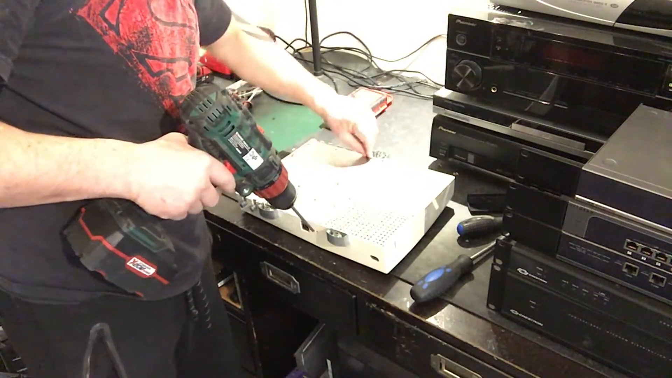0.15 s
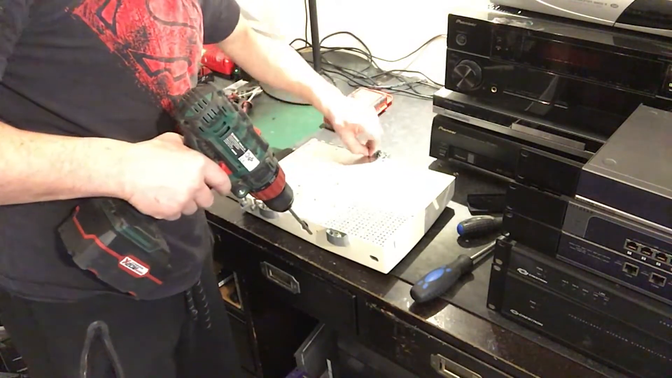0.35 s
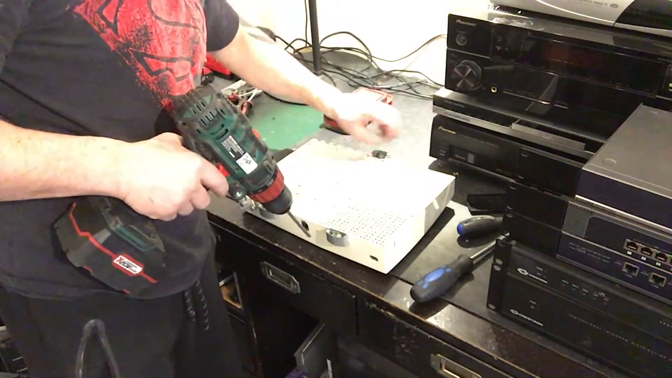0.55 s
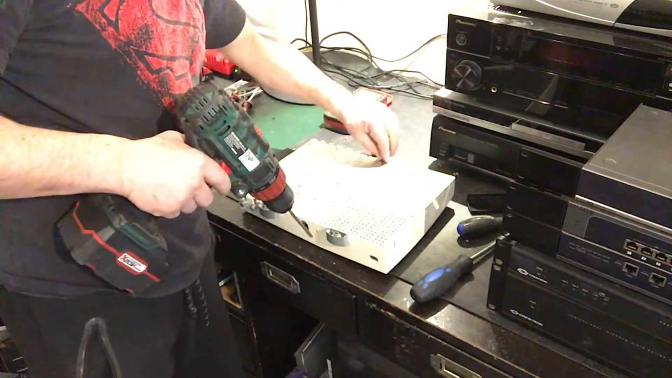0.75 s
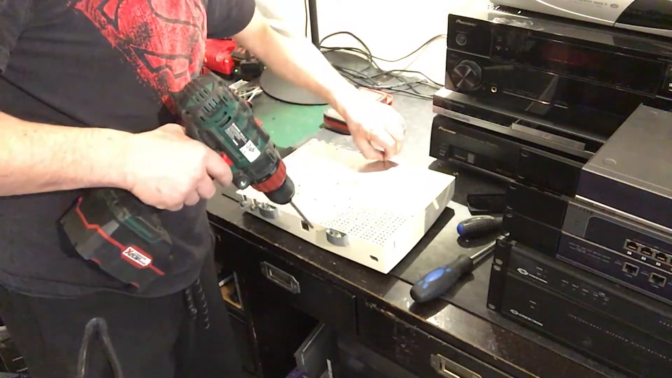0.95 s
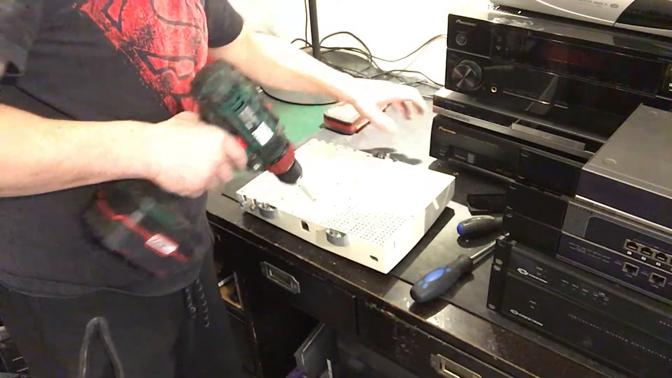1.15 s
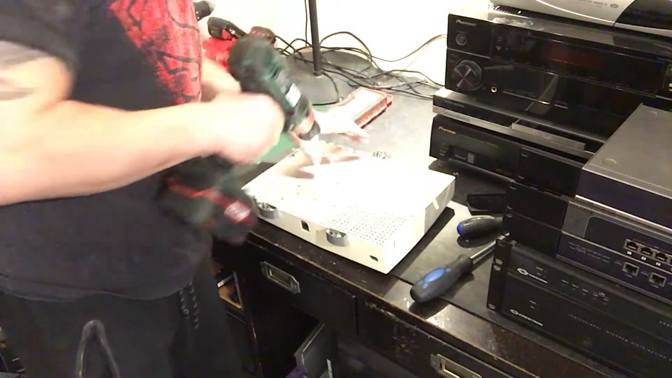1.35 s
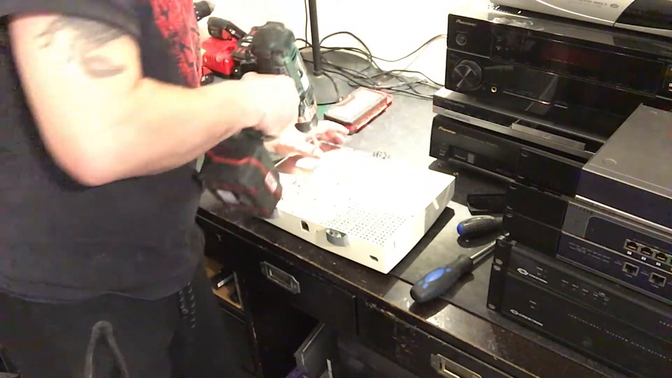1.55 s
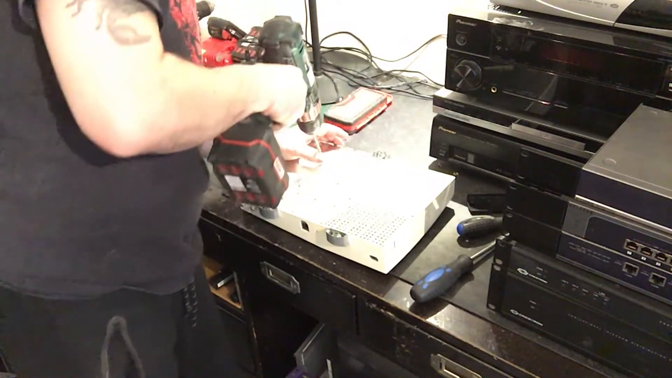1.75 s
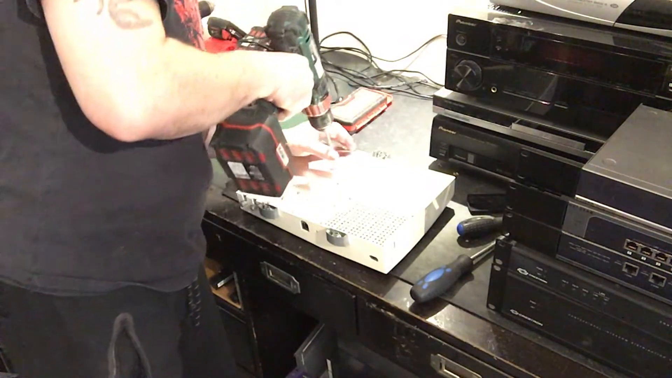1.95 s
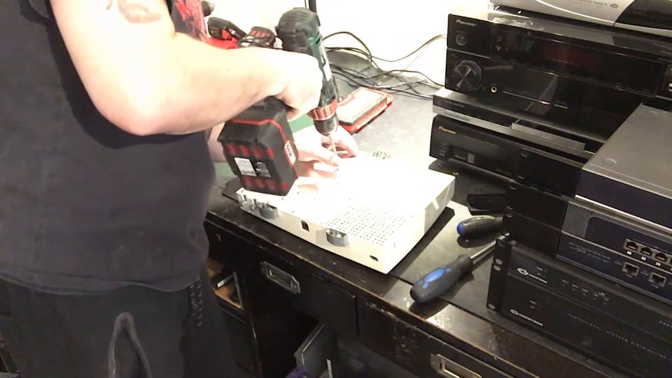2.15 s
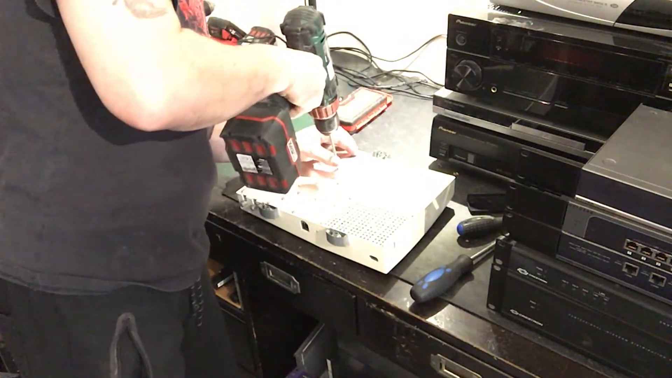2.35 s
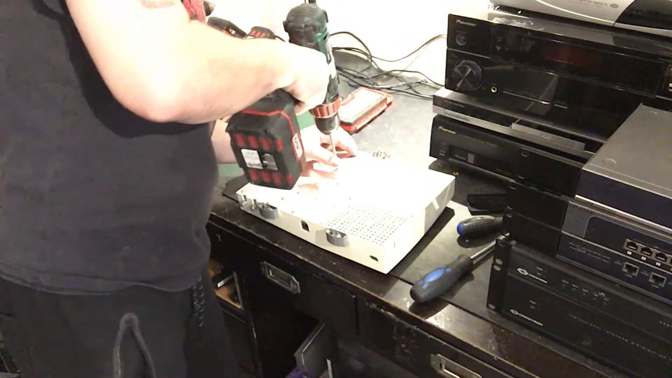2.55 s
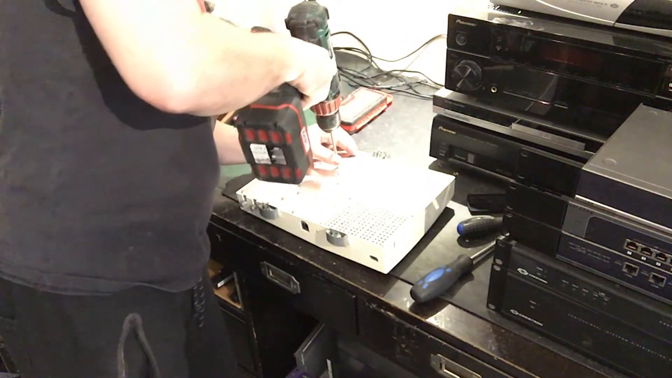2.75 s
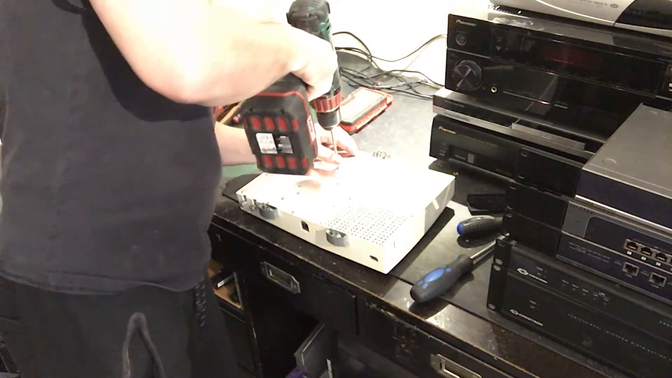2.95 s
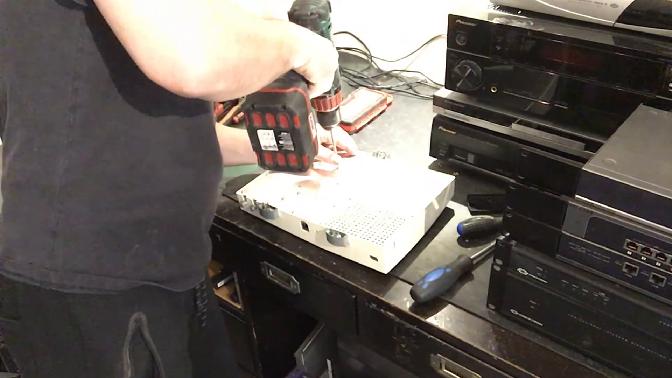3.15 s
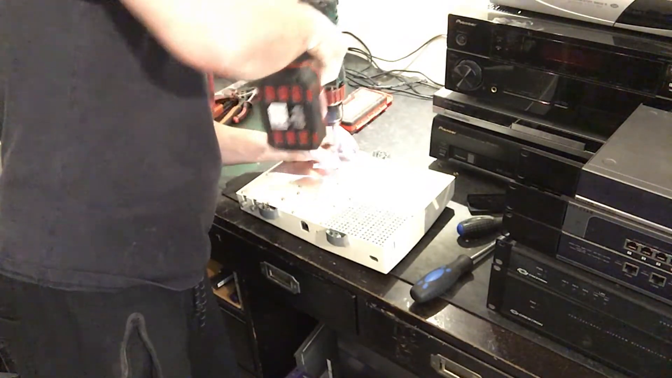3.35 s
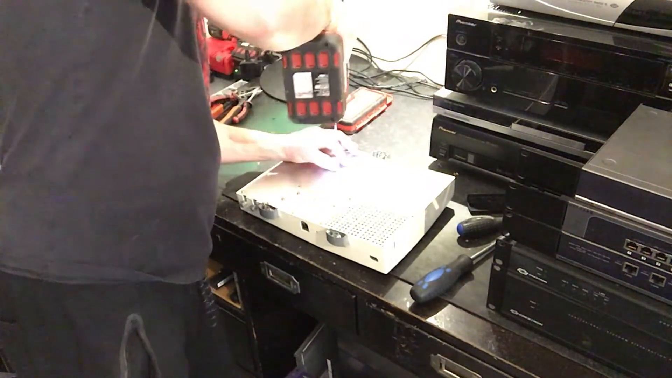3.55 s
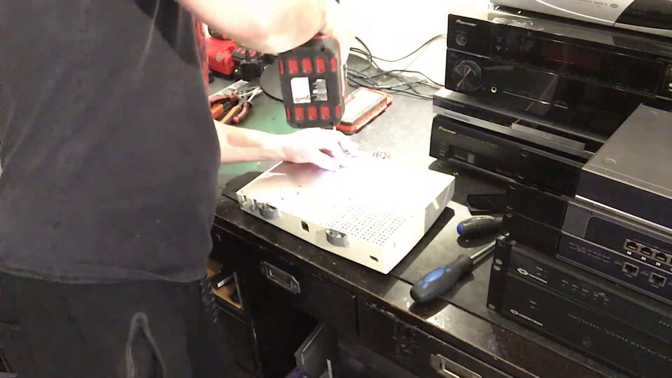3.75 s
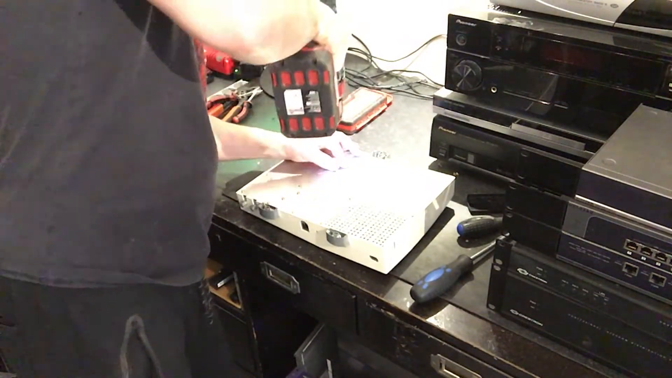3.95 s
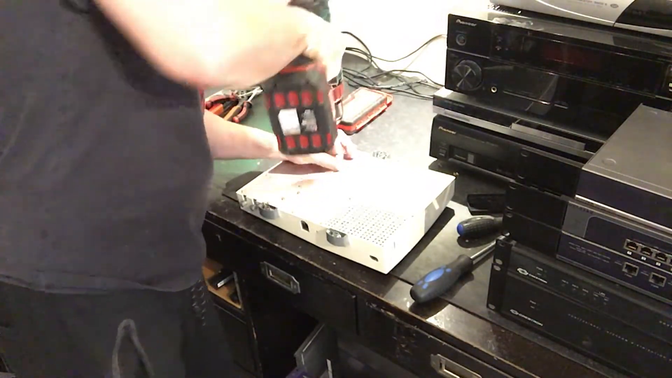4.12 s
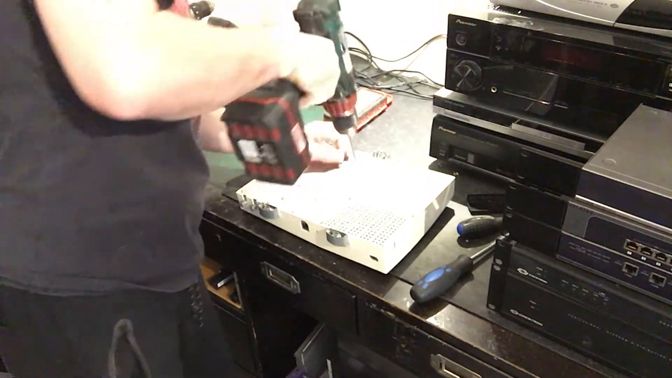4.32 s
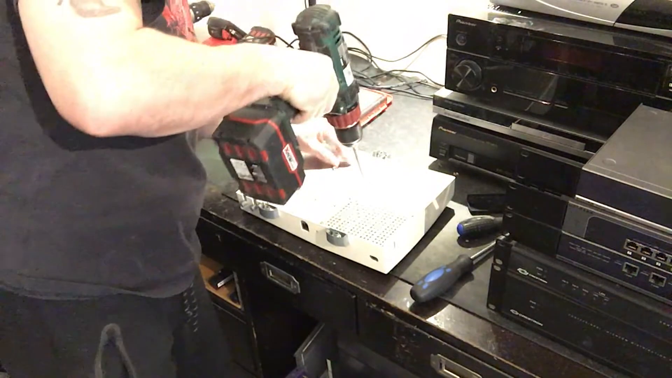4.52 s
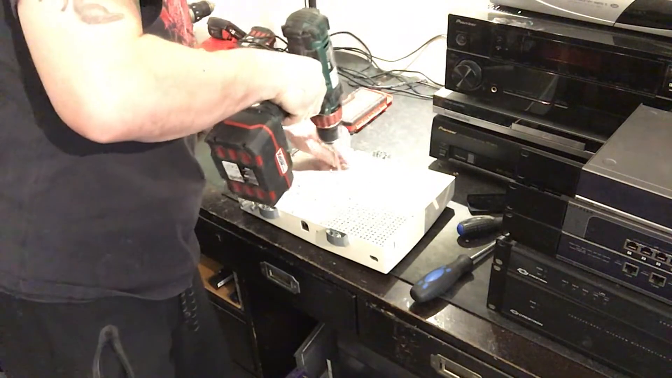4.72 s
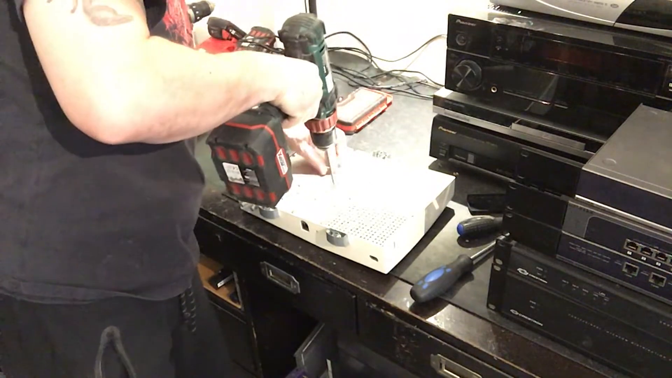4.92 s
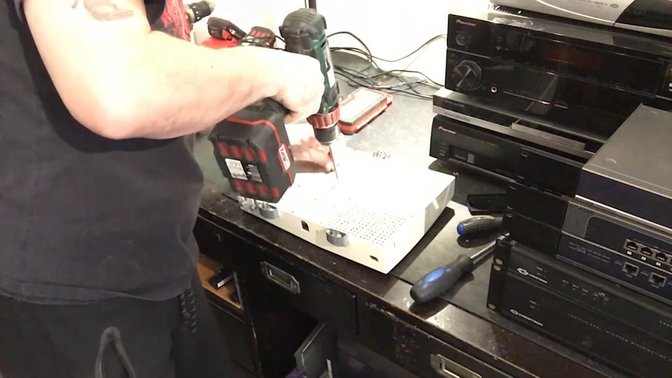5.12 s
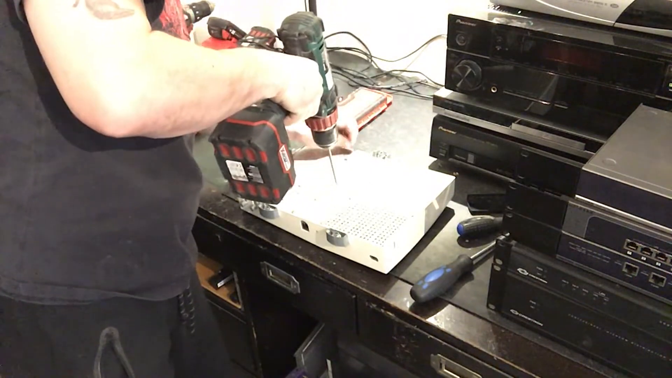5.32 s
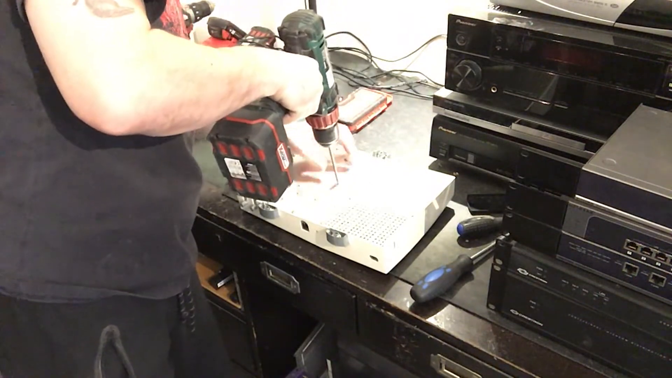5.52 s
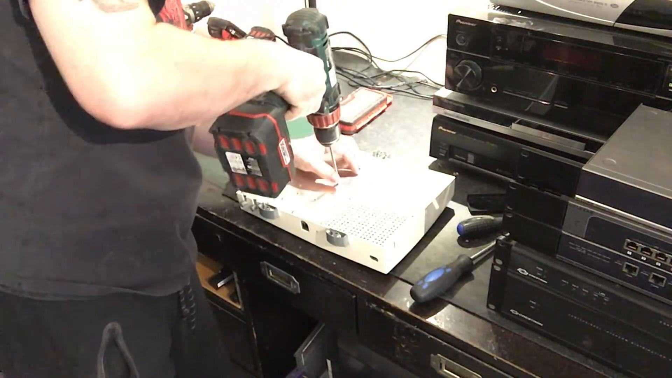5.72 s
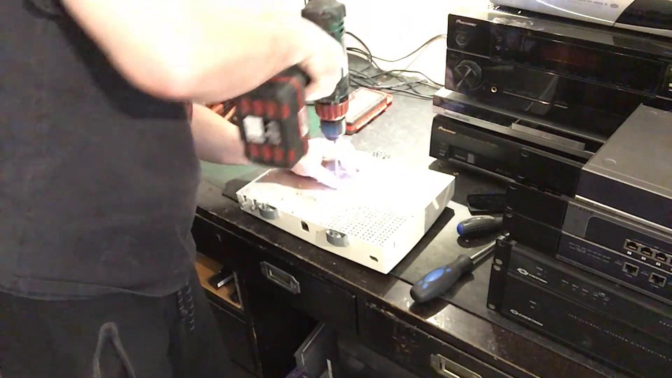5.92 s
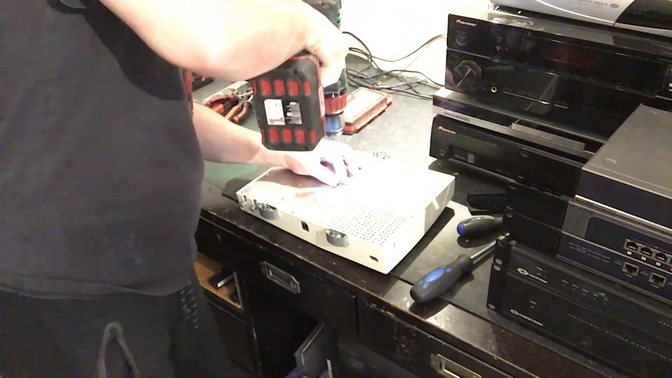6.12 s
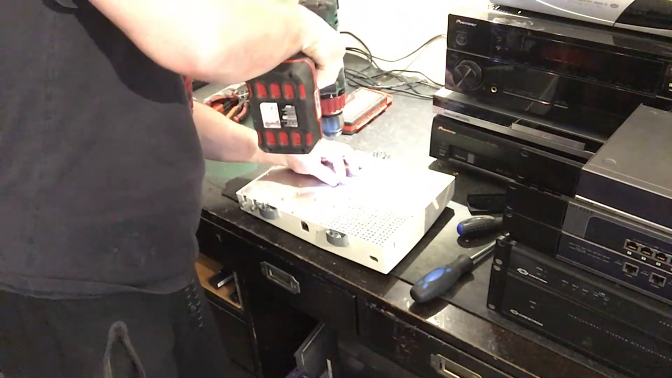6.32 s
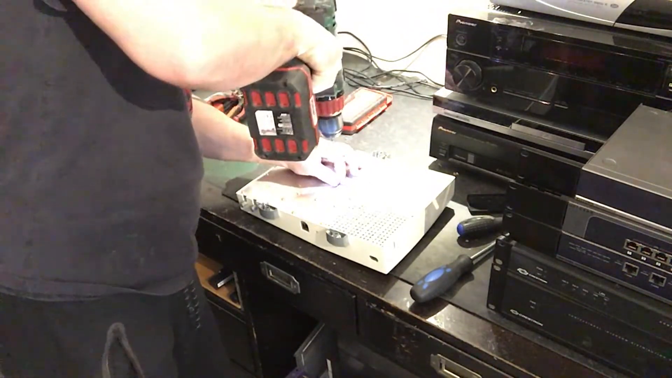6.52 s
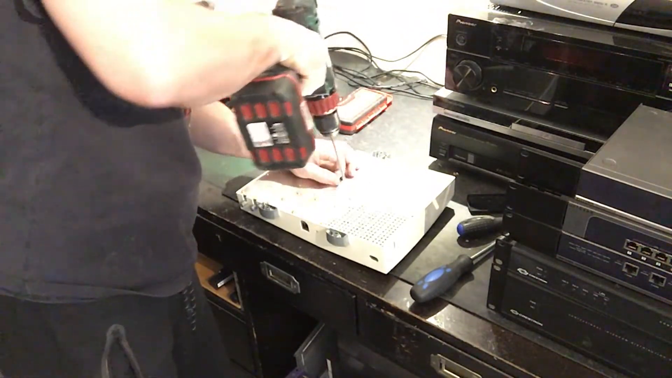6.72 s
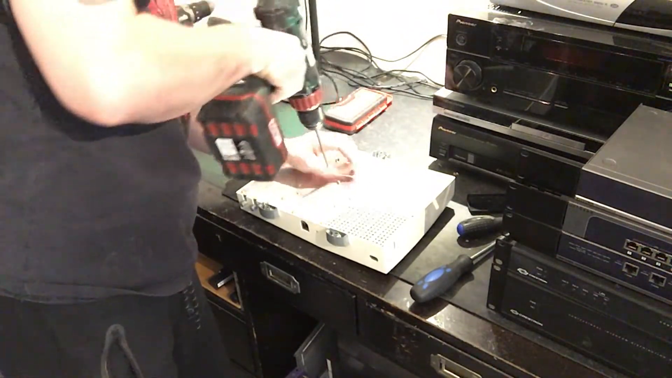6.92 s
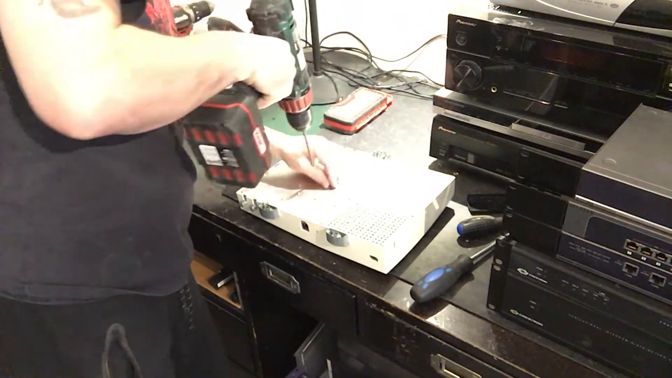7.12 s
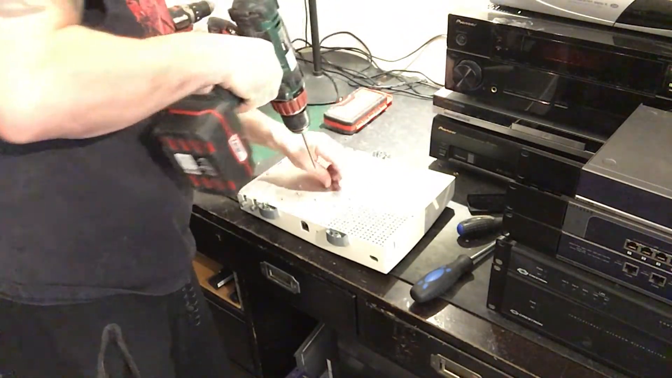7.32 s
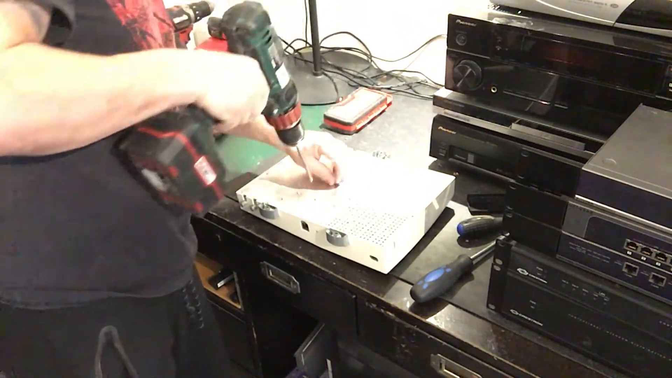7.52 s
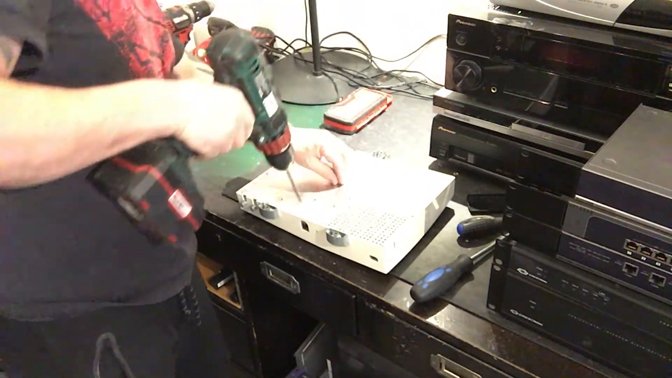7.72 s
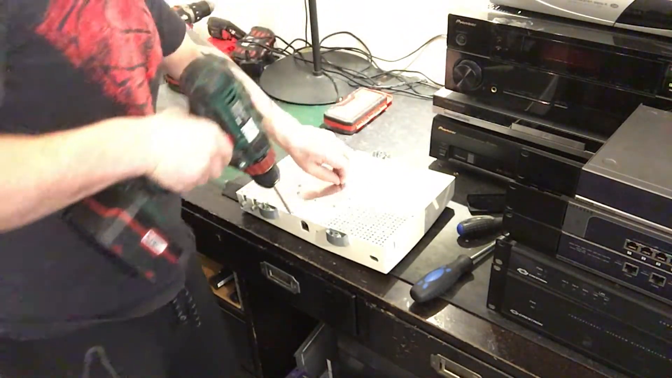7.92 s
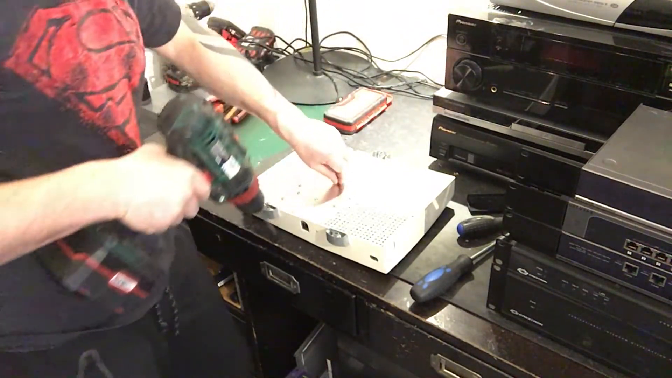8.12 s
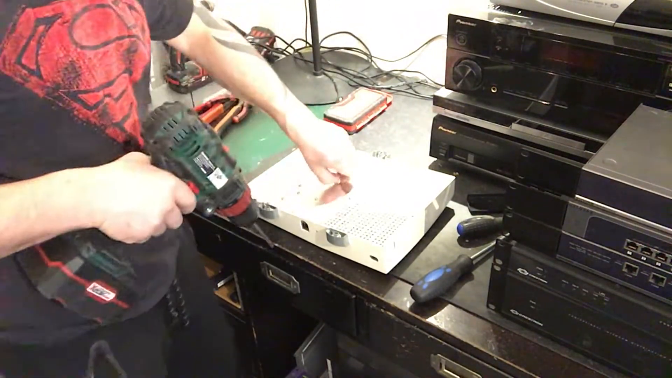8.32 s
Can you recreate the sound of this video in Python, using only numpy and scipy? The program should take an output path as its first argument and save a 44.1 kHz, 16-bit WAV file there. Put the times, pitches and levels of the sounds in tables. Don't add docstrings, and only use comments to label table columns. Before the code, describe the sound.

Light taps and rubs on a hollow casing, then two brief chattering drill runs with sharp clutch and brake knocks, in a small workshop.

```python
import sys
import numpy as np
from scipy import signal
from scipy.fft import rfft, irfft, next_fast_len
from scipy.io import wavfile
from scipy.ndimage import uniform_filter1d

SR = 44100
rng = np.random.default_rng(int(sys.argv[2]) if len(sys.argv) > 2 else 0)


def boost_factor(decibels):
    exponent = np.asarray(decibels, float) / 20
    return 10 ** exponent


def to_wav(s):
    ch = np.atleast_2d(s).T
    pcm = np.round(np.clip(ch, -1, 1) * 32767)
    wavfile.write(sys.argv[1], SR, pcm.astype(np.int16))


N = 373527


def in_time(tables):
    t, out = np.arange(N) / SR, 0
    for rows in tables:
        s, *columns = np.transpose(rows)
        playing = (t >= s[0]) & (t < s[-1])
        out = out + boost_factor([np.interp(t, s, c) for c in columns]) * playing
    return uniform_filter1d(out, size=300, axis=1)


def rms_one(x):
    return x / np.sqrt(np.mean(x ** 2) + 1e-20)


def at_hz(points, hz):
    point_hz, value = np.transpose(points)
    return np.interp(np.log(hz + 1e-9), np.log(point_hz), value)


def band(x, low_hz, high_hz):
    sos = signal.butter(2, [low_hz, min(high_hz, 20000)], "band", fs=SR, output="sos")
    return signal.sosfilt(sos, x)


def coloured(x, spectrum):
    size = next_fast_len(N)
    gain = boost_factor(at_hz(spectrum, np.fft.rfftfreq(size, 1 / SR)))
    return irfft(rfft(x, size) * gain, size)[:N]


def drift(rate_hz):
    r = np.exp(-2 * np.pi * rate_hz / SR)
    wander = signal.lfilter([1], [1, -2 * r, r * r], rng.standard_normal(N + SR))
    return rms_one(wander[SR:])


def resonate(x, hz, width_hz):
    r = np.exp(-np.pi * width_hz / SR)
    poles = [1, -2 * r * np.cos(2 * np.pi * hz / SR), r * r]
    return signal.lfilter([(1 - r * r) / 2, 0, (r * r - 1) / 2], poles, x)


def grains(per_s, spread_db):
    sizes = boost_factor(spread_db * np.minimum(rng.exponential(1, N), 4)) * rng.standard_normal(N)
    return rms_one(sizes * (rng.random(N) < per_s / SR))


def spin(start, stop, db, brake_db):
    slack_s, spin_up_s, settle_s, brake_s, run_down_s = 0.017, 0.021, 0.21, 0.012, 0.12
    slack_db, cold_db, rest_db = -14, -1.5, -27
    bright_db, rest_bright_db = -9.5, -20
    buzz_db, free_buzz_db = -8, -21
    return [(start, db + slack_db, rest_bright_db, free_buzz_db),
            (start + slack_s, db + slack_db, rest_bright_db, free_buzz_db),
            (start + spin_up_s, db + cold_db, bright_db, free_buzz_db),
            (start + settle_s, db, bright_db, buzz_db),
            (stop - brake_s, db, bright_db, buzz_db),
            (stop, db + brake_db, bright_db, free_buzz_db),
            (stop + run_down_s, db + rest_db, rest_bright_db, buzz_db)]


# trigger pulled and released in seconds, gear chatter in dB, brake surge in dB.
DRILL_RUNS = [
    (3.523, 4.209, -29, 6),
    (6.001, 6.709, -26.5, 0),
]
# frequency in Hz, level in dB per Hz.
GEAR_SPECTRUM = [(120, -31), (200, 7.5), (380, 1), (456, -14), (529, -5), (986, -1), (1710, 3), (2290, 1.5),
                 (3070, 4), (7270, -1), (10300, -14), (13800, -15), (16000, -19.5)]
# frequency in Hz, width in Hz, level in dB.
HOUSING = [(690, 560, -12), (877, 150, -5), (1780, 170, -7), (2160, 57, -6), (2865, 950, -11),
           (3055, 90, -6), (3990, 60, -6.5), (4465, 70, -4.5), (5800, 200, -9), (7200, 250, -9),
           (11600, 500, -19), (13700, 500, -19)]


def drill():
    level, bright, buzz = in_time([spin(*run) for run in DRILL_RUNS])
    teeth = grains(10000, spread_db=1.8)
    rings = sum(boost_factor(db + 4 * drift(16)) * resonate(teeth, hz, width) for hz, width, db in HOUSING)
    whirr = coloured(teeth, GEAR_SPECTRUM) + boost_factor(2.5) * rings
    low, middle, high = [rms_one(band(whirr, *edges)) * boost_factor(0.41 * drift(25.7))
                         for edges in ((200, 710), (1100, 5110), (7500, 23500))]
    return level * (buzz * boost_factor(-7.5) * low - middle + bright * high)


# start, fullest moment and end in seconds, level in dB, frequency in Hz.
SINGS = [(6.0, 6.005, 6.03, -37, 4500), (6.015, 6.03, 6.05, -33.5, 5100), (6.05, 6.1, 6.19, -35, 4600),
         (6.09, 6.16, 6.25, -35.5, 2900), (6.17, 6.25, 6.33, -41, 4300), (6.16, 6.25, 6.36, -42.5, 1670),
         (6.26, 6.38, 6.46, -35, 3080), (6.28, 6.4, 6.5, -41, 1900), (6.46, 6.54, 6.62, -37, 2740),
         (6.52, 6.64, 6.72, -33.5, 3070), (6.48, 6.6, 6.7, -40, 3970), (6.5, 6.6, 6.7, -41, 1600),
         (6.045, 6.06, 6.11, -35.5, 730), (3.58, 3.64, 3.72, -39.5, 2100), (3.62, 3.68, 3.78, -43, 4450),
         (3.64, 3.76, 4.02, -41, 2760), (3.7, 3.83, 4.1, -42.5, 3360), (3.65, 3.75, 3.85, -45, 1730),
         (3.88, 4.05, 4.21, -40, 1870), (3.95, 4.08, 4.2, -41.5, 2720), (4.05, 4.15, 4.21, -40.5, 4720),
         (3.95, 4.1, 4.2, -43.5, 3700)]


def singing_housing():
    return singing(SINGS, 5000, width_share=.025)


def singing(rows, per_s, width_share):
    edge_db = -14
    out, grit = np.zeros(N), grains(per_s, spread_db=2.0)
    for start, fullest, end, db, hz in rows:
        a, b = round(start * SR), round(max(end, start + .01) * SR)
        swell_db = np.interp(np.arange(a, b) / SR, (start, fullest, end), (edge_db, 0, edge_db))
        tone = resonate(grit[a - 2000:b], hz, width_share * hz + 40)[2000:]
        out[a:b] += boost_factor(db + swell_db) * rms_one(tone) * np.hanning(b - a) ** .25
    return out


def voiced(rows, kind):
    return [(s, *(db + np.dot((1, bright_db, hollow_db), kind))) for s, db, bright_db, hollow_db in rows]


# frequency in Hz, level in dB, time to fall 60 dB in seconds.
LOW_MODES = [(261.5, -24, 0.2), (327.4, -15, 0.31), (361.6, 4.5, .07), (401.3, 0.5, 0.039), (528, -5, 0.11)]
MIDDLE_MODES = [(648, -7, 0.12), (773, -13, 0.06), (900, 1.5, 0.078), (1150, -8, 0.025)]
# lowest and highest frequency in Hz, time to fall 60 dB in seconds.
CROWDS = [(227, 645, 0.3), (570, 1220, 0.28), (1199, 2660, 0.17), (3060, 6450, 0.19), (7000, 42000, 0.023)]


def blows(rows, lift_db, rattle_s, damping):
    out, t = np.zeros(N + SR), np.arange(SR // 5) / SR
    clear_modes, crowd_lift_db = (LOW_MODES, MIDDLE_MODES, None, None, None), (16.0, 22.5, 0, 0, 0)
    for s, shell_db, body_db, ribs_db, bit_db, tick_db in rows:
        contact = rng.standard_normal(300) * np.exp(-t[:300] / rattle_s) * 0.48
        contact[0] = 2.07
        luck, crowd = rng.standard_normal((6, 2)), rng.standard_normal(len(t))
        crowd[:2] = 5., -3.
        shell_rings = resonate(crowd, 1750, 310) + resonate(crowd, 2821, 560)
        crowd = crowd + shell_rings + 0.88 * resonate(crowd, 4000, 400)
        levels = np.add((body_db, ribs_db, shell_db, bit_db, tick_db), lift_db)
        at = round(s * SR)
        families = zip(clear_modes, CROWDS, levels, crowd_lift_db)
        for k, (modes, (low_hz, high_hz, crowd_t60), db, crowd_db) in enumerate(families):
            fall_db = -60 * damping * t / crowd_t60
            crack_then_buzz = boost_factor(4 * fall_db) + .4 * boost_factor(fall_db)
            sound = crowd * boost_factor(crowd_db) * crack_then_buzz
            if modes:
                hz, mode_db, t60 = np.transpose(modes)[:, :, None]
                hz = hz * (1 + 0.015 * luck[:len(hz), :1])
                strength_db = mode_db + 2.5 * luck[:len(hz), 1:]
                rings = boost_factor(strength_db - 60 * damping * t / t60) * np.sin(2 * np.pi * hz * t)
                sound = sound + signal.fftconvolve(rings.sum(axis=0), contact)[:len(t)]
            sound = band(sound, low_hz, high_hz)
            side = (-1) ** k
            out[at:at + len(t)] += side * boost_factor(db) * sound / np.sqrt(np.mean(sound[:400] ** 2))
    return out[:N]


# level in dB, share of the blow's brightness, share of its hollowness (or bench weight).
CLUTCH_KIND = [(-4, 0.0023, -4.5, -16.5, -52), (0.34, 0, 0.29, 1, .6), (0, 0.01, 0, 0, 9)]
BRAKE_KIND = [(-10, -35, -22.5, 0, -20.5), (-0.5, 0, 1, 0.0037, 1), (0.44, 1, 1.5, 0.0011, 0.5)]
KNOCK_KIND = [(-60, 0, 0, -60, -60), (0, 0, 1, 0, 0), (0, 0, 0, 0, 0)]
# start in seconds, level in dB, brightness in dB, weight on the bench in dB.
STARTS = [
    (3.524, -53, 18, -79),
    (3.5435, -34, 18, -80),
    (3.579, -13.5, -7.5, -34.5),
    (3.619, -41, -10, -80),
    (6.003, -28, 14.5, -38),
    (6.025, -32, 22, -78.5),
    (6.046, -13.5, 0, -35),
    (6.082, -35.5, -10, -79.5),
]
# start in seconds, level in dB, brightness in dB, hollowness in dB.
STOPS = [
    (4.2065, -20, -1, -2),
    (4.223, -16.5, -5, -4),
    (6.704, -21.5, 4, 9),
    (6.7185, -19, 0, 1),
    (6.727, -21.5, -2, 1),
    (6.769, -26.5, -7, -3),
]
# start in seconds, level in dB, brightness in dB, weight on the bench in dB.
THREAD = [(3.899, -40, 2.5, -54), (3.989, -33, -9, -37.5), (4.052, -32, 2.5, -37.5), (4.113, -29.5, 4, -36),
          (4.188, -32, -17, -40.5), (4.268, -47, 18.5, -60), (6.363, -35.5, 11, -38),
          (6.416, -37.5, 10, -38.5), (6.466, -31.5, 5, -39), (6.513, -32, 10, -38), (6.565, -32.5, 6, -36),
          (6.612, -36.5, 5.5, -42.5), (6.659, -21.5, 1, -45.5), (6.71, -38, 8.5, -45.5)]


def driving():
    rows = voiced(STARTS, CLUTCH_KIND) + voiced(STOPS, BRAKE_KIND) + voiced(THREAD, KNOCK_KIND)
    return blows(rows, (-4.5, -12.0, -12.5, -8.5, -14.5), rattle_s=0.0026, damping=1.9)


THUD_KIND = [(-5, 0, -2, -20.5, -39), (0.37, 0.039, -0.02, 1, 0.42), (0, 0.011, 0, 0, 0)]
TAP_KIND = [(0, -22.5, -7.5, -13.5, -34), (0, 0, 0, 1, 0.7), (0, 1, 0.61, 0, 0)]
CLICK_KIND = [(-1.9, -23, -6.5, 0, -11.5), (0.28, 0, 0, 0, 1), (0.46, 1.4, 1, 0, 0)]
# start in seconds, level in dB, brightness in dB, weight on the bench in dB.
THUDS = [(0.4995, -36.5, 16, -48.5), (0.504, -39, -6, -82), (0.5133, -46, -6, -80),
         (1.1185, -49.5, 16.5, -67), (2.5065, -32.5, -5, -45.5), (2.7966, -29, -2, -42),
         (2.823, -52, -10, -80), (2.8702, -34.5, -12, -41.5), (3.255, -42.5, 7, -44), (3.5, -36, -1, -36),
         (5.0217, -35.5, 15, -55), (5.427, -36, 11, -57), (5.6979, -30, 18, -45.5),
         (5.8202, -47, -3, -49.5), (5.9625, -59, 5, -80), (5.984, -50.5, 14, -80)]
# start in seconds, level in dB, brightness in dB, hollowness in dB.
TAPS = [(.0835, -38.5, 16.5, -1), (.175, -31, -2, -2.5), (.3205, -54, 6, 14.5), (.3479, -51, 11, 17),
        (.8066, -37, -7, 0), (.853, -42.5, -7, 6), (1.3806, -26, -13, -11.5), (1.437, -42, 17, -4),
        (1.494, -39.5, -24, -1), (1.5449, -46.5, -10, 5), (1.5817, -45, -14, -8), (3.1012, -49.5, 0, -1),
        (3.411, -65, 10, 5), (3.457, -49.5, 9, 14), (5.7353, -35.5, -13, 8.5), (6.9609, -38, 0.5, 4),
        (7.1516, -43.5, 4.5, -15), (7.5568, -42, 6, -11.5), (8.355, -38, 10, 1.5), (8.3675, -44.5, 2, 6)]
CLICKS = [(4.4199, -62, 9, 6), (4.4355, -43, 12.5, -6), (4.4804, -49.5, 0, -7), (4.574, -60, 2, 8),
          (4.599, -50, -15, 7.5), (4.6297, -48, 4, 3.5), (4.6644, -56, 8, 6), (4.6867, -53, -5, 3),
          (5.0788, -46, -7, -2), (5.2724, -49, -8, -7), (5.357, -45, -11, 1), (5.401, -47, -18, 3),
          (5.412, -43, -19, 6), (8.074, -49, 5, 5.5)]


def handling():
    rows = voiced(THUDS, THUD_KIND) + voiced(TAPS, TAP_KIND) + voiced(CLICKS, CLICK_KIND)
    return blows(rows, (-2.5, -7.5, -12.5, -11.0, -3.5), rattle_s=0.0027, damping=1.31)


# start in seconds, peak in dB, frequency in Hz, cycles to fall 60 dB.
SNAPS = [(4.2058, -10, 4500, 14), (4.2221, -7, 3800, 14), (6.7043, -16, 4700, 14), (6.7045, -22, 2750, 20),
         (6.7268, -16, 3800, 16.5), (6.7692, -20.5, 2900, 18), (6.7692, -22, 4500, 16),
         (6.0255, -15, 4300, 14.5), (6.047, -20, 1600, 14), (6.366, -32.5, 620, 9), (6.413, -33, 620, 9),
         (6.464, -30, 560, 9), (6.512, -29.5, 640, 9), (6.559, -27, 690, 10), (6.608, -31, 740, 13),
         (3.226, -49, 240, 12), (3.393, -45.5, 380, 15), (1.044, -52, 370, 16), (3.103, -48, 1270, 25),
         (5.8195, -49.5, 5200, 40), (5.804, -46, 360, 12), (5.821, -37, 365, 22), (5.859, -46, 370, 10),
         (3.1015, -57, 7300, 110), (7.2195, -56, 2100, 40), (.4975, -44, 13000, 30),
         (5.9473, -58, 1040, 12.5), (5.9632, -53, 3770, 20), (2.799, -32, 820, 22), (2.509, -30.5, 870, 22),
         (.81, -43, 306, 10), (5.0225, -30.5, 557, 10), (5.4265, -32.5, 570, 9), (5.698, -29.5, 600, 7.5),
         (6.048, -20, 880, 23), (.808, -37.5, 1380, 27), (.808, -39.5, 900, 20), (1.121, -50, 1080, 20),
         (3.255, -46, 1500, 30), (3.255, -45, 590, 13), (3.255, -60, 7300, 90), (6.147, -24, 4600, 25),
         (6.385, -24, 3090, 24.5), (3.5785, -36, 13300, 30), (3.4105, -52, 4200, 25),
         (3.4585, -47, 4100, 50), (3.4735, -46, 2600, 30), (5.721, -38, 1620, 30), (5.7205, -44, 4300, 25),
         (6.7205, -18, 6000, 16)]


def snaps():
    out, t = np.zeros(N + SR), np.arange(SR // 10) / SR
    rise_cycles = .3
    for s, db, hz, cycles in SNAPS:
        level = boost_factor(db + 3.5 - 60 * t * hz / cycles) * (1 - np.exp(-t * hz / rise_cycles))
        out[round(s * SR):][:len(t)] += level * np.sin(2 * np.pi * hz * t)
    return out[:N]


# start in seconds, level in dB, frequency in Hz.
PINGS = [(.086, -45, 830), (.086, -36, 2900), (.086, -50, 9800), (0.176, -37.5, 1227), (.349, -58, 6200),
         (.351, -57, 870), (.501, -32, 845), (0.809, -38.5, 1116), (1.383, -42, 1310), (.502, -36, 1790),
         (2.508, -55, 557), (3.1, -45, 1440), (3.102, -48.5, 3400), (3.1, -50, 3050), (4.207, -30, 4353),
         (4.225, -23, 3940), (4.598, -43.5, 837), (4.688, -51.5, 834), (5.023, -40.5, 550),
         (5.27, -52.5, 4520), (5.358, -45, 827), (5.358, -53, 1720), (5.428, -36, 555), (5.428, -50, 1630),
         (5.699, -37, 1680), (5.697, -30.5, 4170), (5.737, -41, 1649), (6.048, -25.5, 1476),
         (6.72, -24, 4430), (6.77, -34, 4510)]
# time in seconds, pitch in Hz, level in dB.
SQUEAK = [
    (1.48, 5200, -84),
    (1.55, 5100, -82),
    (1.64, 4650, -67),
    (1.67, 4400, -78),
    (1.7, 5200, -79),
    (1.75, 5000, -81),
]


def steel():
    t, out = np.arange(N) / SR, np.zeros(N + SR)
    jolt_s, t60_s, t60_cycles = .005, .012, 12
    for s, db, hz in PINGS:
        jolt = rng.standard_normal(SR // 5) * np.exp(-t[:SR // 5] / jolt_s)
        width = np.log(1000) / np.pi / (t60_s + t60_cycles / hz)
        ping = resonate(jolt, hz, width)
        ping = ping - .7 * resonate(jolt, 1.06 * hz, 0.74 * width) - .5 * resonate(jolt, .91 * hz, 1.3 * width)
        out[round(s * SR):][:SR // 5] += boost_factor(db) * ping / np.abs(ping).max()
    s, hz, db = np.transpose(SQUEAK)
    pitch = np.interp(t, s, hz) * (1 + 0.025 * drift(200))
    level = boost_factor(np.interp(t, s, db, -120, -120) + 4 * drift(40))
    return out[:N] + level * np.sin(2 * np.pi * np.cumsum(pitch) / SR)


# start, fullest moment and end in seconds, level in dB, frequency in Hz.
SCRAPES = [(.39, .43, 0.49, -59, 450), (.37, .4, .47, -53, 260), (.93, 1.0, 1.14, -65, 900),
           (.88, .95, 1.1, -73, 3700), (.53, .57, .62, -60, 900), (2.72, 2.75, 2.79, -65, 900),
           (3.52, 3.53, 3.55, -59, 11700), (6.006, 6.015, 6.03, -55, 11700),
           (6.044, 6.0455, 6.054, -47, 13500), (.083, .088, .15, -50, 15200), (2.07, 2.13, 2.23, -70, 6300),
           (3.21, 3.24, 3.31, -56, 846.6), (3.24, 3.27, 3.4, -55, 240), (3.45, 3.465, 3.55, -52.5, 760),
           (4.265, 4.275, 4.31, -50, 850), (4.555, 4.575, 4.7, -72, 6300), (4.64, 4.68, 4.74, -64, 4500),
           (5.395, 5.415, 5.44, -53, 3500), (5.7, 5.72, 5.8, -47.5, 900), (5.71, 5.76, 5.86, -49.5, 1620),
           (5.8, 5.83, 5.87, -57.5, 900), (5.97, 5.99, 6.005, -51, 369.9), (7.08, 7.15, 7.4, -64.5, 4574),
           (7.1, 7.16, 7.25, -63, 2050), (7.07, 7.16, 7.4, -69, 3100), (7.09, 7.15, 7.4, -75.5, 9000),
           (2.51, 2.55, 2.6, -56, 950), (2.51, 2.54, 2.57, -61, 1600), (3.05, 3.07, 3.09, -62, 1350),
           (2.8, 2.84, 2.82, -60, 1600), (5.025, 5.05, 5.1, -55.5, 900), (5.025, 5.05, 5.11, -51, 230),
           (5.43, 5.46, 5.45, -57, 880), (2.06, 2.12, 2.24, -68, 4900), (3.39, 3.44, 3.4, -66.5, 3500),
           (.17, .2, .27, -58, 1150), (5.2, 5.27, 5.36, -70, 4600)]


def scraping():
    return singing(SCRAPES, 2500, width_share=.09)


def stroke(start, firm, end, db, hollow_db):
    edge_db, sizzle_db = -19.5, -14.5
    return [(s, db + change_db, sizzle_db, hollow_db)
            for s, change_db in ((start, edge_db), (firm, 0), (end, edge_db))]


# start, firmest moment and end in seconds, scratch in dB, hollow sound in dB above the scratch.
RUBS = [(0.84, 0.958, 1.08, -73.5, 11.5), (1.5, 1.513, 1.74, -74.5, 12.5), (0.15, 0.166, 0.18, -54, 4.5),
        (1.895, 1.949, 2.045, -61, -29), (2.04, 2.14, 2.26, -74, -18), (2.704, 2.752, 2.73, -77, 11),
        (3.043, 3.074, 3.07, -77, 13), (3.203, 3.256, 3.3, -76, 17), (3.4, 3.48, 3.58, -61, 5),
        (4.553, 4.56, 4.65, -62.5, -7), (4.6, 4.683, 4.66, -61.5, -9), (5.18, 5.29, 5.44, -59, -12),
        (5.336, 5.373, 5.39, -53.5, 2.5), (5.386, 5.414, 5.4, -52.5, 5), (7.04, 7.15, 7.3, -59.5, -7),
        (7.173, 7.225, 7.3, -64.5, -10), (7.821, 7.9, 8.2, -76.5, 6.5), (8.39, 8.414, 9, -73, 4)]
# time in seconds, level in dB.
CREAKS = [
    [(0.33, -75), (0.39, -51), (0.5, -56)],
    [(0.7, -90), (0.812, -53.5), (0.92, -63)],
]


def rubbing():
    scratch, sizzle, hollow = in_time([stroke(*rub) for rub in RUBS])
    grit = grains(6000, spread_db=1.5) * boost_factor(2.3 * drift(21))
    middle = band(grit, 1500, 7000) + 1.5 * resonate(grit, 4650, 500)
    low = band(grit, 330, 2570) + 2.1 * resonate(grit, 755, 82)
    high = band(grit, 5300, 18000)
    creak = in_time(CREAKS)[0] * rms_one(resonate(grit, 194, 17) + 0.24 * resonate(grit, 268, 49))
    return creak + scratch * (rms_one(middle) + sizzle * rms_one(high) + hollow * rms_one(low))


# start in seconds, lowest modes in dB, upper modes in dB.
PUSHES = [(0.19, -49, -61), (0.818, -49, -56), (0.86, -58, -60), (2.74, -52, -55), (2.921, -53, -63),
          (3.139, -54, -61), (3.2, -55.5, -48), (3.405, -46, -51.5), (3.678, -43, -46), (3.78, -49.5, -45),
          (3.929, -42, -36), (4.241, -55, -55), (4.419, -58, -63), (4.639, -56, -65), (4.698, -65, -79),
          (6.197, -46, -46.5), (6.947, -60, -63.5), (7.079, -56, -88), (7.16, -64, -58), (7.25, -67, -78),
          (7.565, -66.5, -70), (7.949, -60.5, -63), (8.021, -65, -77.5), (8.389, -61, -66)]


def booms():
    landed = [(s + 0.0104, db, db - 2.5) for s, _, _, db in THUDS + STARTS]
    knocked = [(s + .002, db, db + 1.5) for s, _, _, db in THREAD]
    return PUSHES + landed + knocked


# frequency in Hz, level in dB, time to fall 60 dB in seconds.
BENCH_MODES = [(62.4, 11.5, 0.27), (49.4, -30, 0.11), (87, -11, 0.34), (125.1, 9.5, 0.15),
               (189.5, -6, 0.11)]


def bench():
    out, t = np.zeros(N + SR), np.arange(SR // 2) / SR
    hz, mode_db, t60 = np.transpose(BENCH_MODES)[:, :, None]
    for s, first_db, upper_db in booms():
        luck = rng.standard_normal((5, 1))
        push_db = np.where(hz < 80, first_db, upper_db + 2.5)
        swell = (1 - np.exp(-t * hz / 1.2)) ** 2
        level = boost_factor(push_db + mode_db - 60 * t / t60) * swell
        at = round((s + 0.011) * SR)
        out[at:at + len(t)] += np.sum(level * np.sin(2 * np.pi * hz * (1 + luck / 30) * t), axis=0)
    return out[:N]


# frequency in Hz, time to fall 60 dB in seconds.
ROOM = [(200, 0.2), (1000, 0.25), (4000, 0.22), (9000, 0.23), (16000, 0.087)]


def workshop(x):
    t, edges = np.arange(SR // 2) / SR, 150 * 2 ** np.arange(0, 7.1, .5)
    white, onset = rng.standard_normal(len(t)), np.clip((t - .003) / 0.0064, 0, 1)
    tail = 0
    for k, (low_hz, high_hz) in enumerate(zip(edges, edges[1:])):
        fall = boost_factor(-60 * t / at_hz(ROOM, np.sqrt(low_hz * high_hz)))
        tail = tail + band(np.roll(white, k * 997), low_hz, high_hz) * onset * fall
    return signal.fftconvolve(x, tail / np.sqrt(np.sum(tail ** 2)))[:N]


# frequency in Hz, level in dB per Hz.
AIR_SPECTRUM = [(18, -36), (30, -3), (103, -1.5), (145, -2.5), (239, -2), (303, 0.5), (461, -9.5),
                (889, -11), (1100, -12.5), (4420, -19.5), (4910, -21), (10500, -31), (14800, -32),
                (16000, -47.5)]


def air():
    hush = rms_one(coloured(rng.standard_normal(N), AIR_SPECTRUM))
    hum = 1.6 * resonate(hush, 152, 20)
    level_db, swell_db = -72.5 + 6.0, .6 * drift(3)
    return boost_factor(level_db + swell_db) * (hush + hum)


def scene():
    motor = boost_factor(-4.8) * drill()
    hits = driving() + handling() + snaps() + steel()
    echoes = workshop(boost_factor(-10.5) * hits + boost_factor(-10.0) * motor)
    mono = motor + boost_factor(1.5) * singing_housing() + hits
    mono = mono + scraping() + rubbing() + bench() + echoes + air()
    return np.array([mono, mono])


def low_pass(x):
    return signal.sosfilt(signal.butter(12, 16490, fs=SR, output="sos"), x)


def record(dry):
    steep = signal.cheby2(10, 45, 16300, fs=SR, output="sos")
    mix = signal.sosfilt(steep, dry)
    return low_pass(mix)


dry = scene()
out = record(dry)
to_wav(out)
```